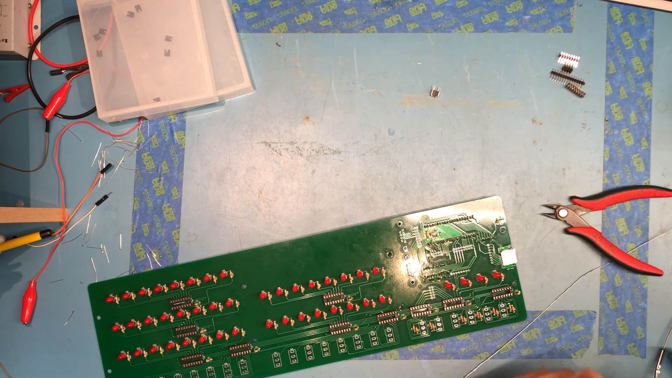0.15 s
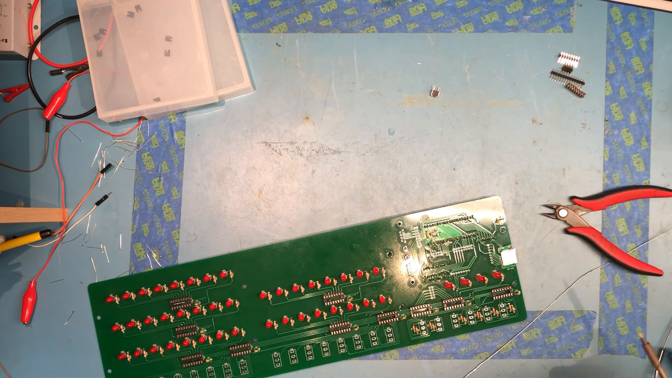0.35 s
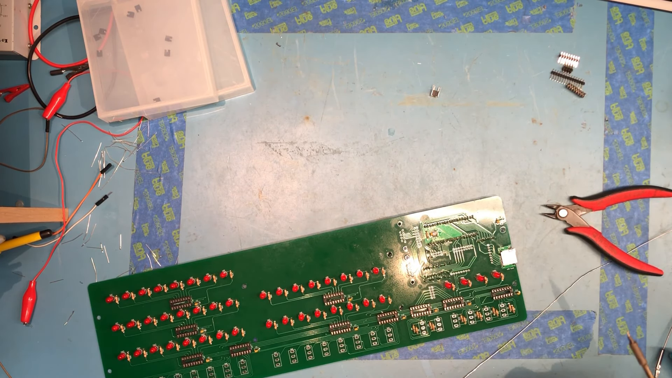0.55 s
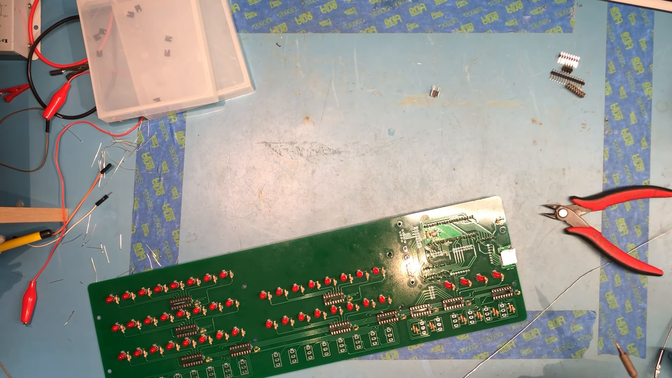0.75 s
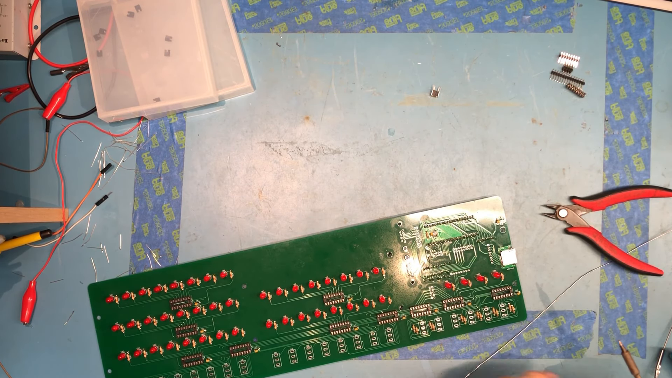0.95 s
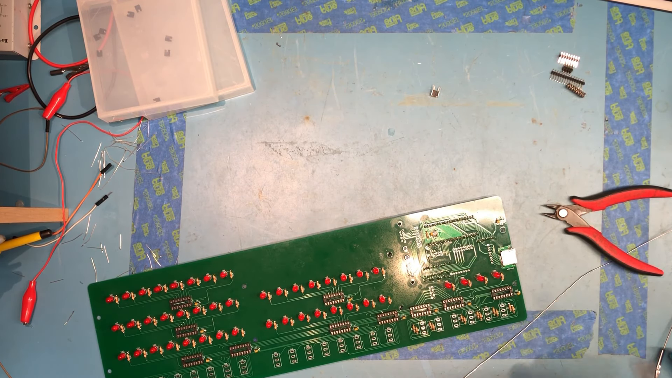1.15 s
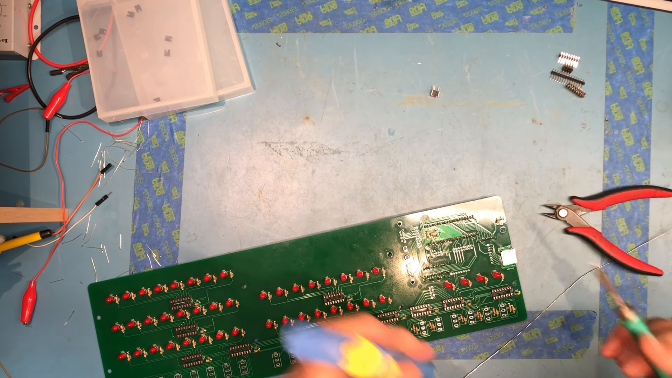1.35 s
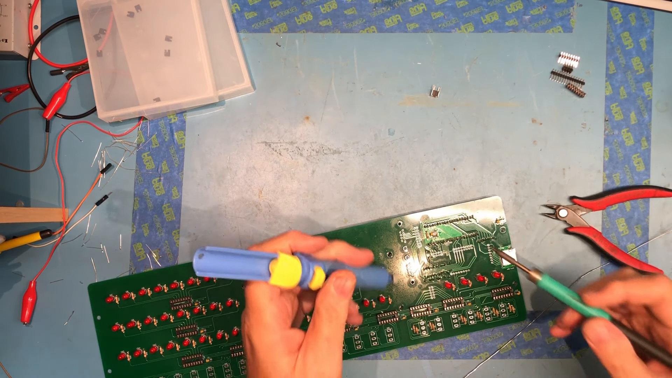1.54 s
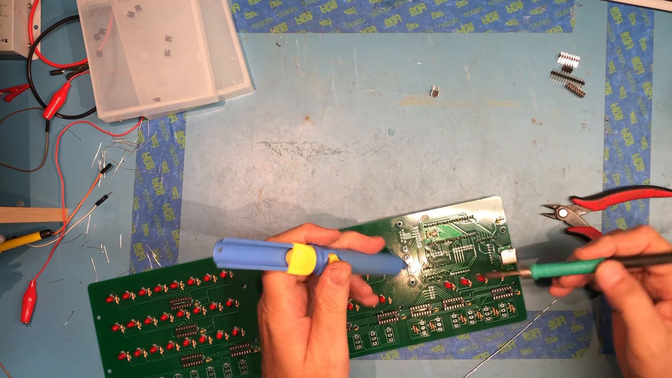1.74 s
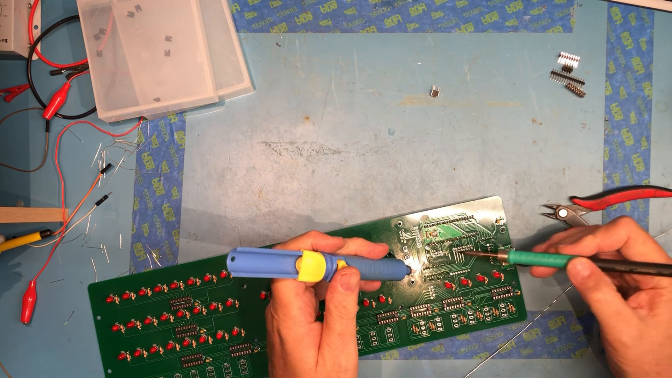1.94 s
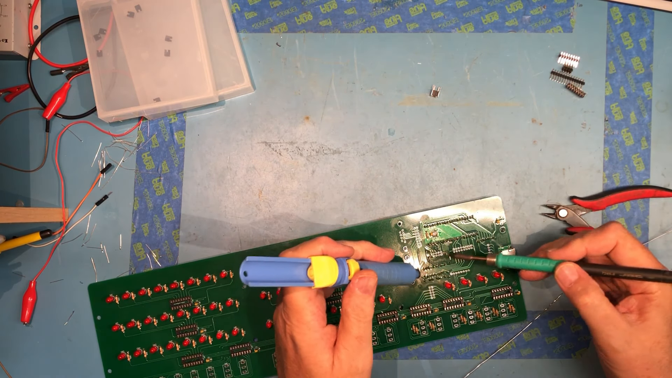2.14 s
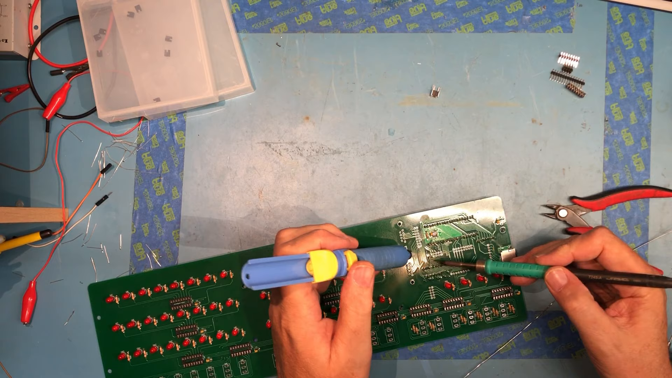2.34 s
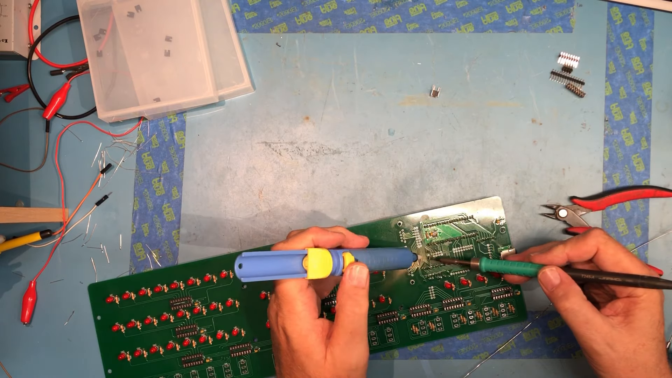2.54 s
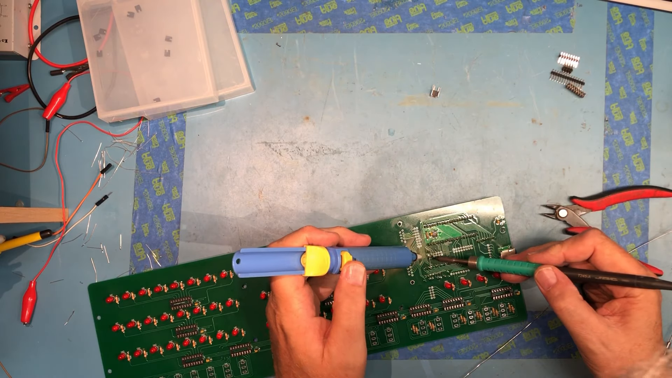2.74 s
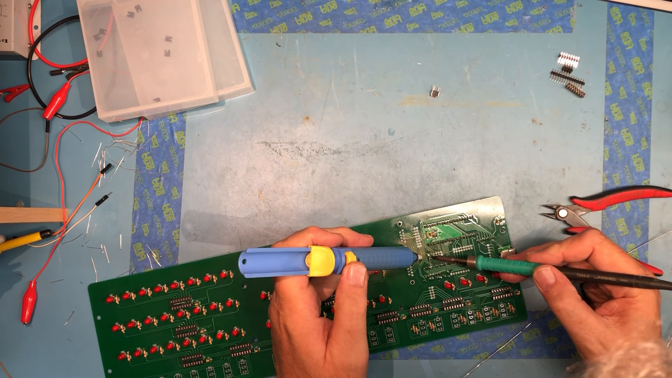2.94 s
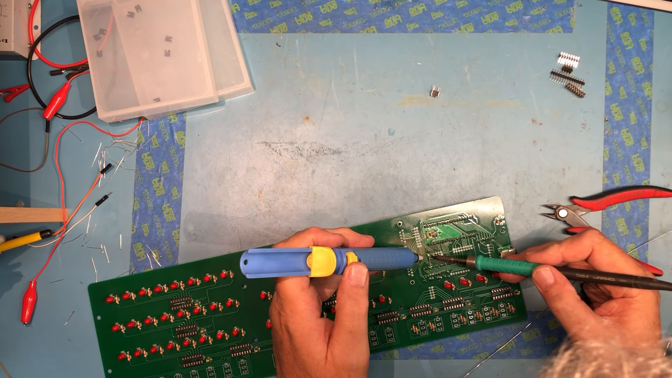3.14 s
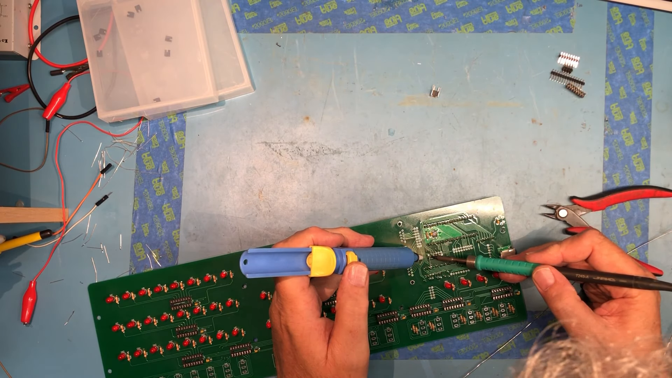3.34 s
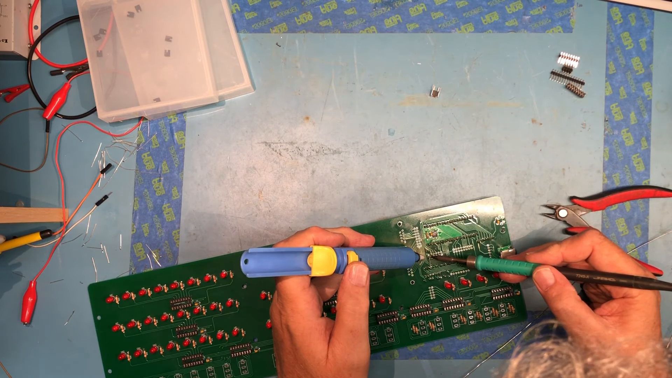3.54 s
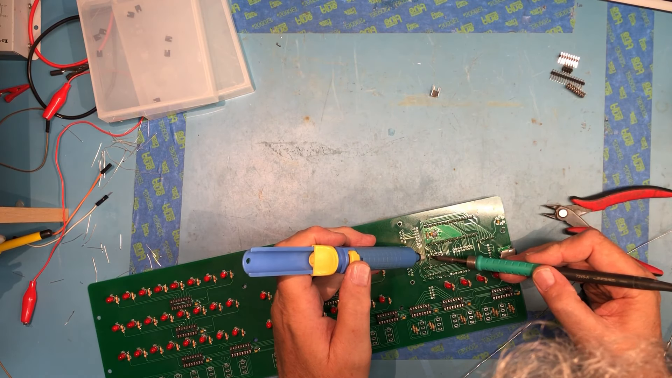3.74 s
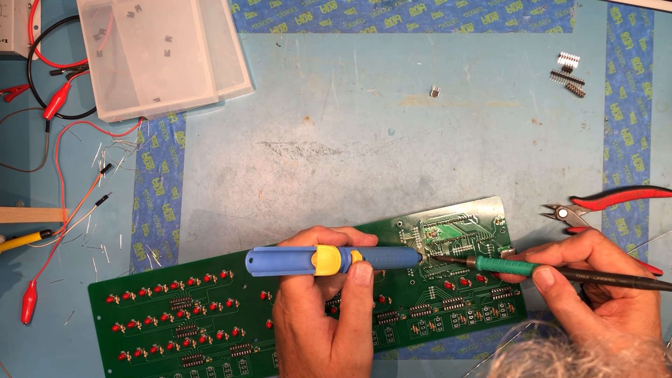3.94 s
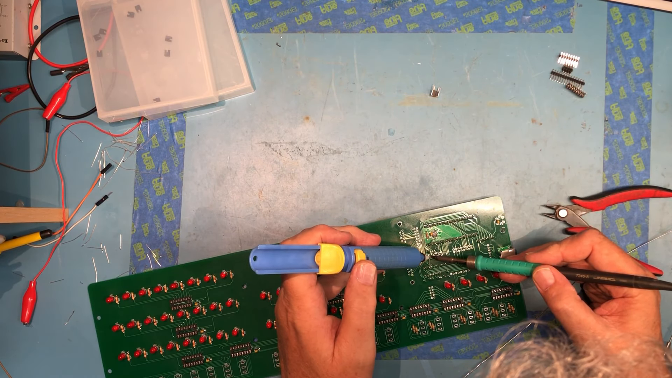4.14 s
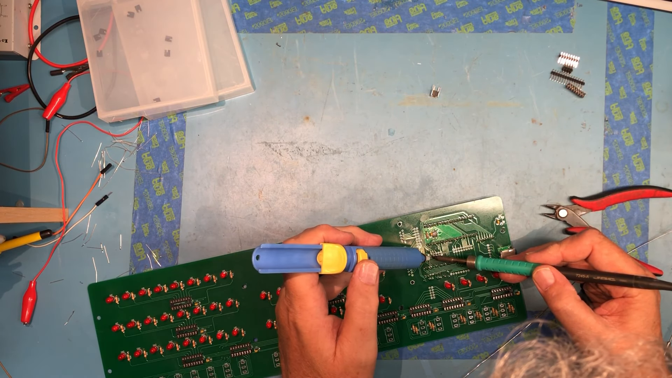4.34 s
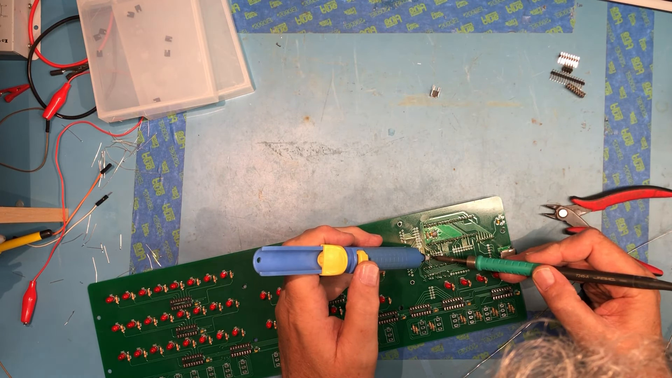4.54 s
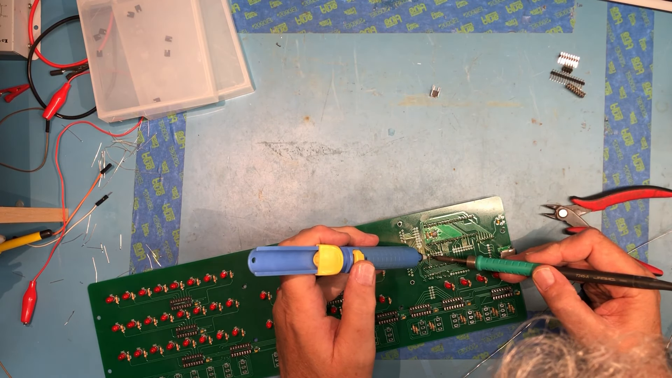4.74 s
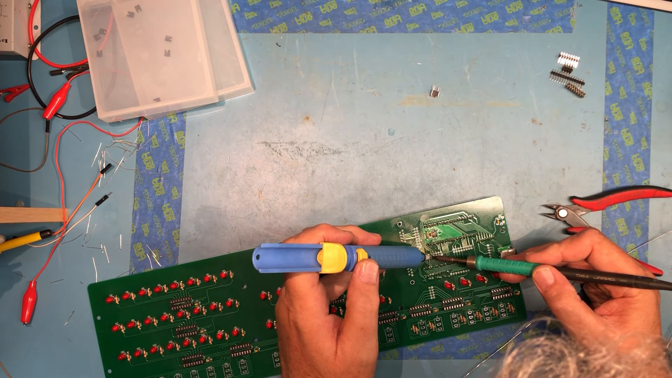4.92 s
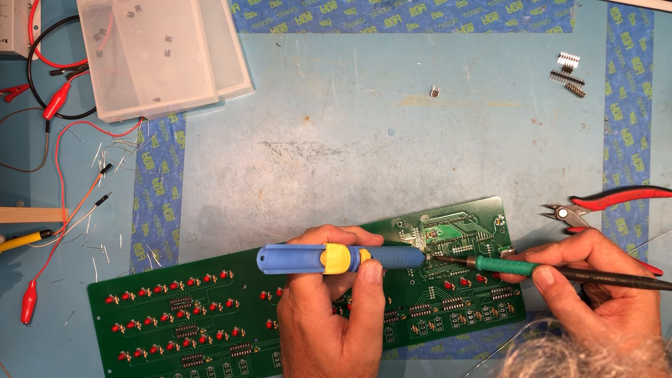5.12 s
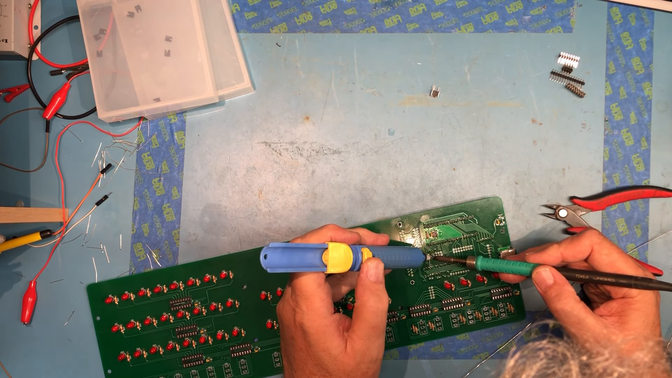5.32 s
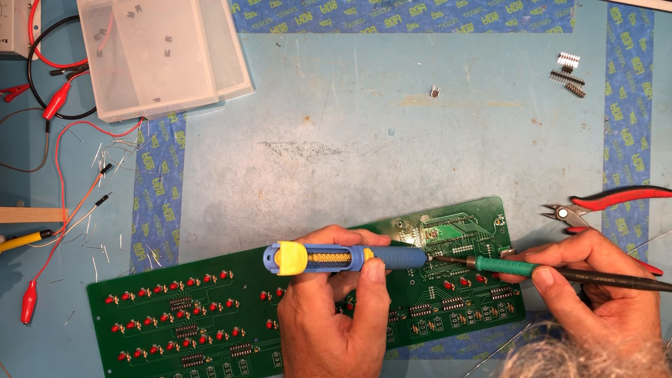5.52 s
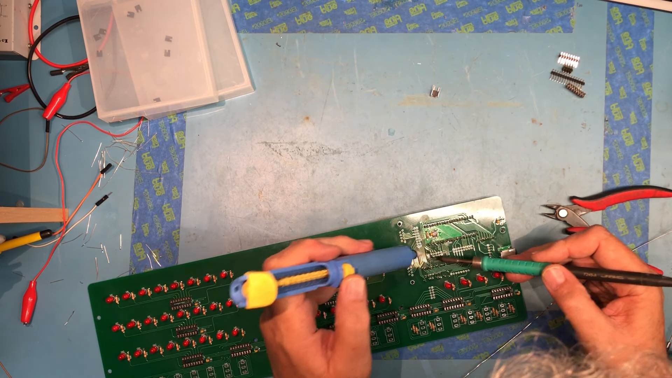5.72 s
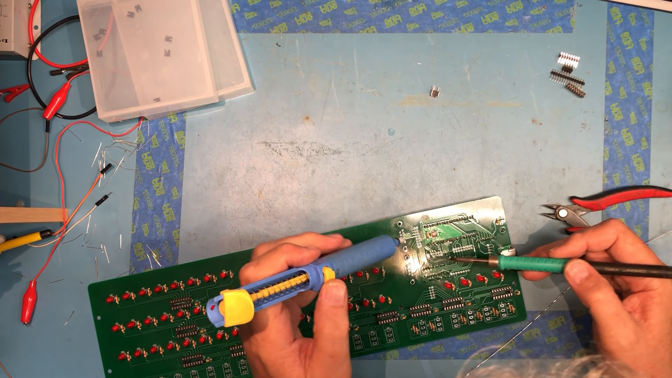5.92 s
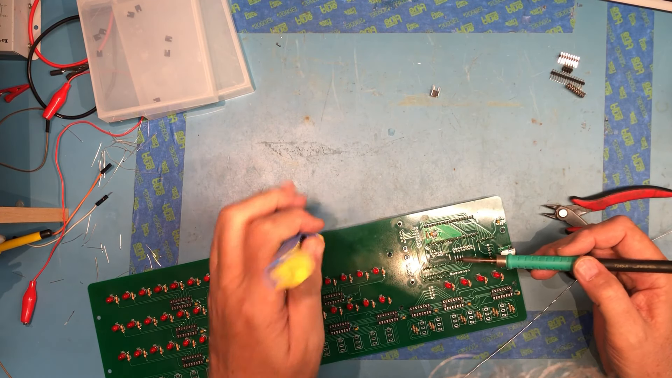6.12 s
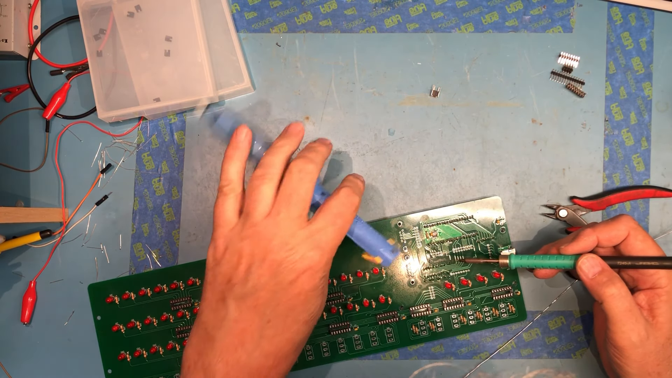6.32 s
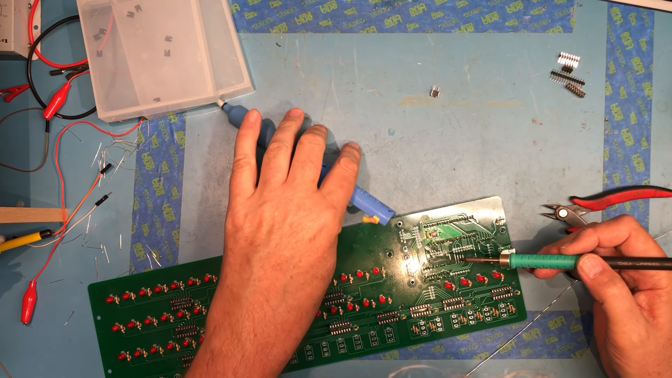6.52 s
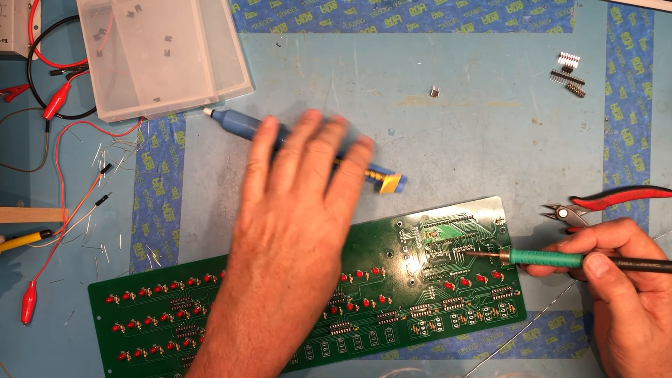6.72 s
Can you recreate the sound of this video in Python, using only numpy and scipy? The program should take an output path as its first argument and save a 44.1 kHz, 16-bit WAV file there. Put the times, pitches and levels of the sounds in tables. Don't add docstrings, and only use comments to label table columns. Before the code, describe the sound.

Close plastic clicks and a latch snap, soft rustling and small board taps, a long quiet, then one explosive spring-pump shot and a hollow clatter.

```python
import sys
import numpy as np
from scipy import signal
from scipy.fft import rfft, irfft, next_fast_len
from scipy.io import wavfile
from scipy.ndimage import uniform_filter1d, map_coordinates

SR = 44100
rng = np.random.default_rng(int(sys.argv[2]) if len(sys.argv) > 2 else 0)


def bounce(signal):
    frames = np.transpose(np.atleast_2d(signal))
    limited = np.clip(frames, -1, 1)
    pcm = np.round(limited * 32767).astype(np.int16)
    wavfile.write(sys.argv[1], SR, pcm)


def linear_from_db(decibels):
    return 10 ** (np.asarray(decibels, float) / 20)


N = 298632
T = np.arange(SR // 4) / SR

# pitch in Hz, width in Hz, level in dB.
FAN_LINES = [(237.4, 3.4, -61), (311, 27, -67.5), (382, 9.6, -69)]
# frequency in Hz, level in dB per Hz.
HUM_COLOUR = [(50, -13), (62, -5.5), (78, -12.5), (140, -9), (175, -16.5), (240, -10.5), (340, -15),
              (580, -21), (800, -19.5), (1150, -19), (1450, -20), (1750, -26.5), (2300, -32), (3200, -44)]
# frequency in Hz, level in dB per Hz.
RUMBLE_COLOUR = [(22, -58.5), (30, -8.5), (43, 8), (56, -6.5), (75, -28), (100, -52), (200, -120)]
# frequency in Hz, level in dB per Hz.
HISS_COLOUR = [(1500, -26.5), (2400, -4.5), (3200, -1), (4500, -3.5), (6500, -5), (9000, -8),
               (12000, -11.5), (16000, -15)]
# time in seconds, level in dB.
TRAFFIC_LEVEL = [(0.0, -55), (0.19, -51), (2.98, -54), (3.13, -48), (5.32, -55), (5.45, -42), (5.6, -55.5),
                 (6.75, -53), (6.77, -59)]
# start in seconds, length in seconds, pitch in Hz, level in dB.
DRONE_SWELLS = [(0.2, 0.29, 138.8, -68), (0.604, 0.28, 126.7, -58.5), (1.148, .33, 119.5, -54.5),
                (1.555, 0.27, 135, -60.5), (1.997, 0.37, 144.1, -54), (2.451, 0.32, 140, -56),
                (2.949, 0.53, 141.6, -52.5), (3.546, 1, 144.6, -57.5), (4.499, 0.68, 140.6, -60),
                (5.897, 0.33, 119.7, -65), (6.3, 0.32, 119.7, -57.5)]
# frequency in Hz, t60 in seconds.
ROOM_DECAY = [(150, 0.23), (1500, 0.17), (5000, 0.16), (14000, 0.11)]

# time in seconds, movement in dB.
ARM_MOVEMENT = [(0, -66.5), (.46, -65.5), (.62, -59.5), (.81, -60), (.97, -61.5), (1.07, -74.5),
                (1.24, -63.5), (1.43, -78), (1.73, -70.5), (2.0, -66.5), (2.25, -69.5), (2.5, -75.5),
                (2.8, -108), (5.5, -108), (5.68, -80.5), (5.85, -85.5), (6.2, -69), (6.55, -85.5)]
# frequency in Hz, level in dB per Hz.
RUB_COLOUR = [(1200, -40.5), (2500, -3.5), (4000, -5), (6500, -5.5), (8500, -14), (12000, -41)]
# frequency in Hz, level in dB per Hz.
SWISH_COLOUR = [(4500, -36), (7000, 1.5), (10500, 6), (13500, 0), (16000, 1.5)]
# frequency in Hz, level in dB per Hz.
SWAY_COLOUR = [(0, -19), (1.5, 19.0), (4, 18.5), (12, 12.5), (22, 6), (30, 0.5), (45, -47.5), (100, -120)]
# middle in seconds, level in dB, half length in seconds, ring in Hz, ring level in dB.
SCUFF_EVENTS = [(0.029, -64, .014, 7800, 8), (0.074, -66, .01, 9000, 3), (0.11, -66, .014, 8180, -2),
                (.28, -60, .004, 3490, 3), (1.461, -68.5, .025, 8510, -6), (4.186, -72, 0.0038, 11610, 0),
                (.26, -60.5, 0.066, 11500, -16), (0.531, -65, 0.035, 5442, 8), (1.018, -67, 0.019, 3453, 5),
                (1.121, -57, 0.0062, 4225, 9), (1.223, -50.5, 0.013, 11300, -15),
                (1.301, -59.5, 0.0096, 3000, -2.5), (1.804, -63, .035, 6920, -18.5),
                (1.895, -61.5, 0.025, 4063, 0), (2.052, -49, 0.021, 3415, 1), (2.161, -60, 0.023, 3200, -3),
                (2.295, -53, 0.0134, 5500, -12), (2.626, -70, 0.023, 13000, -6),
                (5.679, -62, 0.011, 13580, -3), (4.526, -64.5, .025, 6400, -7),
                (6.133, -64, 0.041, 7970, -0.5), (6.251, -66, 0.01, 9000, -7.5),
                (6.34, -65, .018, 10800, -5), (6.382, -63, 0.023, 10650, -8)]
# time in seconds, level in dB, pitch in Hz.
SQUEAK_PATH = [(2.32, -84, 15200), (2.36, -78, 14200), (2.42, -76, 12900), (2.49, -79, 11600)]
# time in seconds, level in dB, pitch in Hz.
SOFT_THUMPS = [(.05, -44, 245), (.354, -34, 200), (.39, -48, 120.8), (.45, -48, 229.6), (.886, -40, 329.5),
               (2.025, -44.5, 570), (5.407, -32, 350), (6.685, -34, 139), (6.718, -54, 138)]

# time in seconds, peak in dB, weight in dB, brightness in dB, favoured ring in Hz.
PUMP_TAPS = [(0.3017, -37.5, -7, -25, 2460), (0.3154, -42, -17, -11, 3450),
             (0.3521, -33.5, -5, -31.5, 3700), (0.625, -29.5, -16, 4, 7000), (0.6787, -34.5, -17, 2, 11800),
             (0.6806, -22.5, -25, 4.5, 3720), (0.8824, -20, -8.5, -6, 2790),
             (0.8863, -25.5, -2, -8.5, 3380), (1.1054, -41, -23, -11, 3950),
             (1.4172, -52.5, -8.5, -8, 2900), (1.5305, -59.5, -10, 8.5, 8900), (1.6287, -52, -5, -21, 3284),
             (1.701, -51.5, -3, -8.5, 5603), (5.6206, -32, -15.5, -18.5, 4530),
             (5.6875, -35.5, -11.5, -29, 3850), (5.7374, -45, -21, -9.5, 3630),
             (5.7665, -60, -7.5, 7.5, 3920), (6.0345, -49, -7, -17, 2500), (6.1514, -42.5, -24, -4, 3300),
             (6.2846, -48.5, -8, -14, 2790)]
# time in seconds, peak in dB, weight in dB, brightness in dB, favoured ring in Hz.
TIP_TAPS = [(1.2895, -50.5, 8.5, -7, 3380), (1.8978, -48.5, 4.5, 3, 3870), (1.9394, -55, 11.5, -9, 2550),
            (2.0245, -26.5, 0.5, -5.5, 4700), (2.0307, -28, -8, -8, 3200), (2.056, -42, -9, -2, 3350),
            (2.1191, -47, -4, -5, 5000), (2.9404, -54.5, 8, -8, 3000), (3.8294, -54, 1, -18.5, 3090),
            (4.4082, -38.5, -4, -1, 4206)]
# frequency in Hz, level in dB per Hz.
TICK_COLOUR = [(1500, -22.5), (2800, 4.5), (5000, 2.5), (7500, -1.5), (10000, -9), (16000, -36.5)]
# frequency in Hz, level in dB per Hz.
SPARKLE_COLOUR = [(5000, -30.5), (8000, -1.5), (11000, 1), (14000, -5), (16000, -8)]
# frequency in Hz, level in dB per Hz.
KNOCK_COLOUR = [(300, 0), (700, -4), (1500, -2.5), (2500, -10.5), (4000, -59.5)]
# pitch in Hz, level in dB, t60 in seconds.
BENCH_MODES = [(148, -2.5, 0.014), (225.2, -0.5, 0.039), (292, -5.5, 0.03), (376.8, 1, 0.04),
               (447, -7, .04), (570, -9.5, 0.09)]
# pitch in Hz, level in dB, t60 in seconds.
SHELL_MODES = [(573, -10, 0.029), (2982, -1, 0.03), (3361, -10, 0.082), (4630, -15, 0.04),
               (5335, -20, 0.11), (5730, -24, 0.21), (7175, -21, 0.085), (7822, -25.5, 0.18)]
# pitch in Hz, level in dB, t60 in seconds.
BOARD_MODES = [(533, -21.5, 0.083), (890, -5, 0.07), (2050, -5, 0.073), (2620, -4, 0.025), (3300, -25, 5.0),
               (4285, -19, 0.095), (4560, -21, 0.064), (5700, -36, 0.018)]
# time in seconds, level in dB, pitch in Hz, t60 in seconds.
SMEAR_EVENTS = [(.302, -43.5, 1350, .025), (.3525, -40, 1350, .02), (.3525, -40, 2400, .02),
                (.8826, -30, 10200, .02), (.8826, -34, 14600, .015), (.8826, -32, 8000, .015),
                (.883, -30, 4800, .035), (.884, -31, 3450, .06), (2.026, -40, 1200, .04),
                (2.052, -42, 3400, .05), (2.058, -48, 1700, .04), (2.153, -54, 3900, .04),
                (2.291, -51, 3250, .08), (2.297, -57, 2200, .04), (2.288, -52, 4000, .06),
                (2.293, -48, 4900, .06), (2.296, -48, 6600, .03), (2.9405, -38, 1400, .025),
                (2.9405, -44, 1950, .02), (5.44, -40, 1625, .2), (5.621, -44, 2000, .03),
                (5.621, -45, 3100, .05), (5.689, -51, 3050, .03), (5.689, -52, 2100, .03),
                (5.738, -52, 3800, .03), (6.698, -33, 9200, .05), (6.698, -34, 3300, .03),
                (6.715, -33, 2900, .04), (6.722, -33, 9200, .05), (6.728, -33, 7600, .07)]
# time in seconds, level in dB, pitch in Hz, t60 in seconds.
CLEAR_NOTES = [(.3025, -46, 3000, .012), (.3525, -24, 4100, 0.0089), (1.106, -47.5, 4200, .05),
               (1.213, -47, 7700, .03), (1.215, -46, 11400, 0.028), (1.232, -44, 5360, .03),
               (1.417, -54.5, 3300, 0.032), (2.031, -36, 601, .04), (4.41, -51.5, 4180, 0.056),
               (6.683, -32.5, 135, 0.084), (6.718, -20.5, 4620, 0.068), (.356, -35.5, 195, 0.077),
               (.738, -29.5, 385, 0.048), (.884, -26.5, 330, 0.044), (2.0245, -34, 582, 0.057),
               (2.0245, -36, 395, 0.079), (.3535, -28, 118, .06), (5.407, -25.5, 257, 0.065),
               (5.406, -25.5, 520, 0.07), (5.408, -41, 95, .16), (5.408, -38, 170, .14),
               (5.406, -27.5, 1037, 0.042), (5.445, -38.5, 496, .09), (6.546, -33, 2050, .03),
               (6.546, -38, 498, .05), (6.606, -35, 868, 0.05), (6.606, -45, 480, .06),
               (6.608, -30, 9300, .05), (6.606, -39.5, 140, 0.13), (6.549, -39, 12400, .03),
               (5.409, -28.5, 1201, 0.045)]

# time in seconds, level in dB, hiss pitch in Hz.
PLUNGER_SLIDE = [(.63, -58, 5000), (.655, -50, 5300), (.676, -46, 5700), (.69, -43, 6300),
                 (.712, -41, 6500), (.722, -49, 6500), (.735, -46, 6500)]
# frequency in Hz, level in dB per Hz.
LATCH_COLOUR = [(100, -25.5), (400, -5), (800, -19), (1250, -9), (1950, -13), (2350, 0), (2800, 0),
                (3300, 1.5), (4200, -9.5), (5500, -4.5), (9300, -1), (12800, -0.5), (15800, -11.5)]
# pitch in Hz, level in dB, t60 in seconds.
CATCH_MODES = [(2350, -14, .1), (3500, -11, 0.13), (5300, -12, .1), (6200, -12, 0.15), (7210, -24, .1),
               (7300, -14.5, 0.17), (9300, -6, 0.16), (10400, -13, 0.22), (10300, -4.5, 0.059),
               (12300, 1.5, 0.052), (12660, -9, 0.11), (14120, -21, 0.24)]
# frequency in Hz, level in dB per Hz.
PISTON_COLOUR = [(200, -39), (600, -18.5), (1100, -15.5), (1700, -14.5), (2300, -16.5), (3000, -11),
                 (3900, -9), (5300, -5.5), (6300, 0), (7000, -5), (8200, -1), (10800, 2), (13300, -1),
                 (15800, -9.5)]
# time in seconds, level in dB, t60 in seconds.
PISTON_BLOWS = [(5.4048, 4, 0.026), (5.4105, -4.5, 0.034), (5.4175, -10.5, 0.039),
                (5.425, -26, .05), (5.4325, -17, 0.064), (5.44, -33.5, 0.27)]
# pitch in Hz, level in dB, t60 in seconds.
SPRING_MODES = [(2600, -19, .5), (3800, -6, .07), (7700, 0, .12), (8240, -2, .1), (10223, 1, .1),
                (13036, 0, .1), (5102, -2, .15), (5392, 2.5, 0.13), (6100, 11.5, 0.04), (6605, -5, 0.18),
                (9230, -1, .12), (11100, -0.5, .12), (12500, -3, 0.1)]
# frequency in Hz, level in dB per Hz.
LINGER_COLOUR = [(800, -30), (2000, -3), (3500, 0), (5000, -1), (8000, -8), (14000, -25)]
# time in seconds, peak in dB, weight in dB, tube ring in dB, nozzle ring in dB.
BARREL_BOUNCES = [(6.545, -28, -5.5, -8.5, -22), (6.549, -25.5, -15, -29, -23.5),
                  (6.6051, -29.5, -6, -1, -6), (6.608, -26, -5.5, -24, -13), (6.682, -39.5, 6, -14, -4),
                  (6.687, -40, 4, -13, -14), (6.697, -22.5, -7, -22, -13), (6.7005, -29, -10, -6, 10),
                  (6.714, -24, -5, 11.5, -18), (6.7202, -21, -5, 1.5, -23), (6.726, -26.5, 0, -6.5, -25),
                  (6.7335, -31, -3, -10, -15)]
# pitch in Hz, level in dB, t60 in seconds.
BARREL_MODES = [(2520, -8, 0.075), (3210, -12, 0.064), (5600, -13, 0.14), (6120, -14, .067),
                (6506, -8, 0.089), (6960, -4, 0.059), (7550, -3.5, 0.079), (8660, -12, .045),
                (8812, -8, 0.078), (9350, -9, 0.067), (10300, -19, 0.088), (12400, -11, 0.074)]
# pitch in Hz, level in dB, t60 in seconds.
TUBE_MODES = [(137.7, -14, 0.24), (390, -19, 0.05), (909, -13.5, 0.073), (1452, -0.5, 0.051),
              (1620, -2, 0.026), (3000, -14, 0.046)]
# pitch in Hz, level in dB, t60 in seconds.
NOZZLE_MODES = [(4590, 0.5, 0.076), (5500, -22, 0.096), (7360, -13, 0.077), (9300, -10, 0.062)]


def unit(x):
    return x / np.sqrt(np.mean(x ** 2) + 1e-20)


def along(points, hz):
    f, v = np.transpose(points)
    return np.interp(np.log(hz + 1), np.log(f + 1), v)


def curves(rows, **ends):
    s, *cols = np.transpose(rows)
    return [np.interp(np.arange(N) / SR, s, c, **ends) for c in cols]


def wobble(rate):
    return map_coordinates(rng.standard_normal(int(N * rate / SR) + 4), [np.arange(N) * rate / SR])


def noise(spectrum, size=N):
    m = next_fast_len(size)
    gain = linear_from_db(along(spectrum, np.fft.rfftfreq(m, 1 / SR)))
    return unit(irfft(rfft(rng.standard_normal(m)) * gain, m)[:size])


def blur(hz, width_hz, size=len(T)):
    skirt = [(1, 0), (width_hz, -3), (4 * width_hz, -30), (20 * width_hz, -80)]
    return noise(skirt, size) * np.cos(2 * np.pi * np.cumsum(hz * np.ones(size)) / SR)


def patchy(x, depth_db, window, wide, long):
    z = signal.stft(x, nperseg=window)[2]
    field = uniform_filter1d(rng.standard_normal(z.shape), wide, 0)
    field = uniform_filter1d(field, long, 1)
    return unit(signal.istft(z * linear_from_db(depth_db * unit(field)), nperseg=window)[1][:len(x)])


def rattle(spectrum, depth_db):
    return patchy(noise(spectrum, len(T)), depth_db, window=128, wide=2, long=5)


def fade(t60, attack):
    return linear_from_db(-60 * T / t60) * (1 - np.exp(-T / attack))


def ring(modes, rough):
    out = np.zeros(len(T))
    for hz, db, t60 in modes:
        tone = (1 - rough) * np.sin(2 * np.pi * hz * T) + rough * blur(hz, 0.018 * hz)
        out += linear_from_db(db) * fade(t60, 0.0014) * tone
    return out


def burst(spectrum, envelope):
    m = 2 * len(T)
    z = rfft(rng.standard_normal(len(T)) * envelope, m)
    power = np.abs(z) ** 2
    luck = np.sqrt(uniform_filter1d(power, size=300) / np.mean(power)) + .1
    x = irfft(z / luck * linear_from_db(along(spectrum, np.fft.rfftfreq(m, 1 / SR))), m)[:len(T)]
    return unit(x) * np.sqrt(np.mean(envelope ** 2))


def add(track, s, sound, wet_db):
    hz, t, z = signal.stft(rng.standard_normal(SR // 3), SR, nperseg=128)
    tail = signal.istft(z * linear_from_db(-60 * t / along(ROOM_DECAY, hz)[:, None]), SR, nperseg=128)[1]
    tail /= np.linalg.norm(tail)
    heard = linear_from_db(wet_db) * signal.fftconvolve(np.pad(sound, (120, 0)), tail)
    heard[:len(sound)] += sound
    echo_s = .0011 * rng.uniform(.8, 1.25)
    heard[round(echo_s * SR):][:len(sound)] += linear_from_db(-12) * sound
    part = track[round(s * SR):][:len(heard)]
    part += linear_from_db(0.43) * heard[:len(part)]


def contact(thud_db, knock_db, sparkle_db, t60):
    tick = burst(TICK_COLOUR, fade(t60, 0.0013))
    sparkle = linear_from_db(sparkle_db) * burst(SPARKLE_COLOUR, fade(t60, 0.0005))
    knock = linear_from_db(knock_db) * burst(KNOCK_COLOUR, fade(2.2 * t60, 0.0011))
    return tick + sparkle + knock + linear_from_db(thud_db - 3.0) * ring(BENCH_MODES, rough=.3)


def room_tone():
    rumble_db, = curves(TRAFFIC_LEVEL)
    hum = patchy(noise(HUM_COLOUR + [(5000, -90)]), 1.2, window=1024, wide=8, long=8)
    out = linear_from_db(-55.5 + .7 * wobble(0.81)) * hum + linear_from_db(-71.5) * noise(HISS_COLOUR)
    for hz, width_hz, db in FAN_LINES:
        flutter = .75 + .35 * wobble(width_hz)
        out += linear_from_db(db) * flutter * np.sin(2 * np.pi * hz * np.arange(N) / SR)
    return out + linear_from_db(rumble_db + 1.0 + 2.8 * wobble(14)) * noise(RUMBLE_COLOUR)


def drone():
    base_hz, base_db, edge_s = 135, -70, .06
    t = np.arange(N) / SR
    gain, pull = linear_from_db(base_db) * np.ones(N), np.zeros(N)
    for s, length, hz, db in DRONE_SWELLS:
        on = np.clip(np.minimum(t - s, s + length - t) / edge_s, 0, 1)
        gain += linear_from_db(db) * on
        pull += (hz - base_hz) * on
    pitch = base_hz + pull + 4 * wobble(31)
    return gain * linear_from_db(2.8 * wobble(16)) * np.sin(2 * np.pi * np.cumsum(pitch) / SR)


def rustle(colour):
    grain = linear_from_db(2.3 * wobble(150) + 1.8 * wobble(14) + 1.4 * wobble(4.4))
    return patchy(noise(colour) * grain, 2.6, window=256, wide=8, long=12)


def hands():
    busy_db, = curves(ARM_MOVEMENT)
    follow_db = 0.31 * np.maximum(busy_db + 64.5, -25)
    sway = linear_from_db(-38 + follow_db + 2.6 * wobble(6.2)) * noise(SWAY_COLOUR)
    return linear_from_db(busy_db - 0.65) * rustle(RUB_COLOUR) + linear_from_db(busy_db + 1.1) * rustle(SWISH_COLOUR) + sway


def scuffs():
    db, hz = curves(SQUEAK_PATH, left=-120, right=-120)
    out = linear_from_db(db - 1.5 + 3.5 * wobble(60)) * np.sin(2 * np.pi * np.cumsum(hz + 60 * wobble(200)) / SR)
    for s, db, half, hz, ring_db in SCUFF_EVENTS:
        grain = np.abs(noise([(1, 1), (150, -2.0), (600, -17.0)], len(T))) ** 0.66
        swell = np.exp(-((T - T.mean()) / half) ** 2) * grain
        sound = 4500 / hz * rattle(TICK_COLOUR, depth_db=3.0)
        sound += hz / 9000 * rattle(SPARKLE_COLOUR, depth_db=4.5)
        sound += linear_from_db(ring_db) * blur(hz, 260)
        add(out, s - T.mean(), linear_from_db(db) * swell * sound, wet_db=-9.0)
    return out


def thumps():
    out = np.zeros(N)
    for s, db, hz in SOFT_THUMPS:
        push = noise([(hz / 4, -12), (hz / 2, -3), (hz, 0), (1.75 * hz, -10), (4 * hz, -50)], len(T))
        add(out, s, linear_from_db(db + 3.0) * push * fade(0.11, 0.0024), wet_db=-8.0)
    return out


def taps(rows, body, thud_db, ring_db, favour_db):
    out = np.zeros(N)
    for s, db, weight_db, bright_db, hz in rows:
        touch = contact(weight_db + thud_db, weight_db, bright_db, 0.015)
        favoured = linear_from_db(favour_db) * ring([(hz, 0, .011)], rough=0.33)
        rings = linear_from_db(weight_db + ring_db) * ring(body, rough=0.38) * fade(.08, .0003)
        add(out, s, linear_from_db(db - 3.0) * (touch + favoured + rings), wet_db=-6.5)
    return out


def pump_taps():
    return taps(PUMP_TAPS, SHELL_MODES, thud_db=4.5, ring_db=3, favour_db=6.5)


def smears():
    out = np.zeros(N)
    for s, db, hz, t60 in SMEAR_EVENTS:
        tone = .5 * np.sin(2 * np.pi * hz * T) + .7 * blur(hz, .05 * hz)
        add(out, s, linear_from_db(db) * tone * fade(t60, .001), wet_db=-8.5)
    return out


def notes():
    out = np.zeros(N)
    for s, db, hz, t60 in CLEAR_NOTES:
        add(out, s, linear_from_db(db) * ring([(hz, 0, t60)], rough=0.057), wet_db=-10.5)
    return out


def cocking():
    db, hz = curves(PLUNGER_SLIDE, left=-120, right=-120)
    hiss = blur(hz, 540, N) + 0.26 * noise(TICK_COLOUR) + .4 * noise(SPARKLE_COLOUR)
    out = linear_from_db(db + 1.5 * wobble(130)) * hiss
    crack = np.exp(-((T - .0016) / .0008) ** 2)
    shiver = linear_from_db(-9.5) * fade(.07, 0.0012)
    add(out, .7361, linear_from_db(-6) * burst(LATCH_COLOUR, crack + shiver), wet_db=-8.5)
    add(out, .737, linear_from_db(-17) * ring(CATCH_MODES, rough=.4) * fade(.2, 0.00033), wet_db=-12.5)
    add(out, .7565, linear_from_db(-27) * burst(LATCH_COLOUR, fade(.03, .0004)), wet_db=-8.0)
    return out


def board_taps():
    return taps(TIP_TAPS, BOARD_MODES, thud_db=1, ring_db=-5, favour_db=6)


def firing():
    out = np.zeros(N)
    slip = noise(PISTON_COLOUR, len(T)) * (T / 0.012) * (T < .004)
    add(out, 5.4008, linear_from_db(-26.0) * slip, wet_db=-11.0)
    for s, db, t60 in PISTON_BLOWS:
        blow = fade(t60, .00015) * linear_from_db(1.5 * wobble(300)[:len(T)])
        add(out, s, linear_from_db(db) * burst(PISTON_COLOUR, blow), wet_db=-5.5)
    dying = fade(.6, .03) * np.cos(np.pi / 2 * T / T.max())
    add(out, 5.45, linear_from_db(-52) * rattle(LINGER_COLOUR, depth_db=2.5) * dying, wet_db=-6.0)
    add(out, 5.405, linear_from_db(-25) * ring(BENCH_MODES, rough=.25), wet_db=-5.5)
    add(out, 5.406, linear_from_db(-22.0) * ring(SPRING_MODES, rough=0.38), wet_db=-5.0)
    return out


def bounces():
    out = np.zeros(N)
    for s, db, weight_db, tube_db, nozzle_db in BARREL_BOUNCES:
        rings = linear_from_db(-4.5) * ring(BARREL_MODES, rough=0.74)
        rings += linear_from_db(tube_db) * ring(TUBE_MODES, rough=.15)
        rings += linear_from_db(nozzle_db) * ring(NOZZLE_MODES, rough=0.31)
        add(out, s, linear_from_db(db) * contact(weight_db - 5, weight_db, -5.0, 0.021), wet_db=-6.0)
        add(out, s, linear_from_db(db) * rings, wet_db=-20)
    return out


def scene():
    background = room_tone() + drone()
    handling = hands() + scuffs() + thumps() + pump_taps() + board_taps() + smears() + notes()
    pump = cocking() + firing() + bounces()
    return (background + handling + pump)[None]


def roll_off(x):
    return signal.sosfilt(signal.butter(12, 15940, fs=SR, output="sos"), x)


def record(dry):
    z = rfft(np.clip(dry, -.92, .92))
    over_khz = np.maximum(np.fft.rfftfreq(N, 1 / SR) - 15700, 0) / 1000
    mix = np.clip(irfft(z * linear_from_db(-45 * over_khz), N), -1, 1)
    return roll_off(mix)


dry = scene()
out = record(dry)
bounce(out)
```